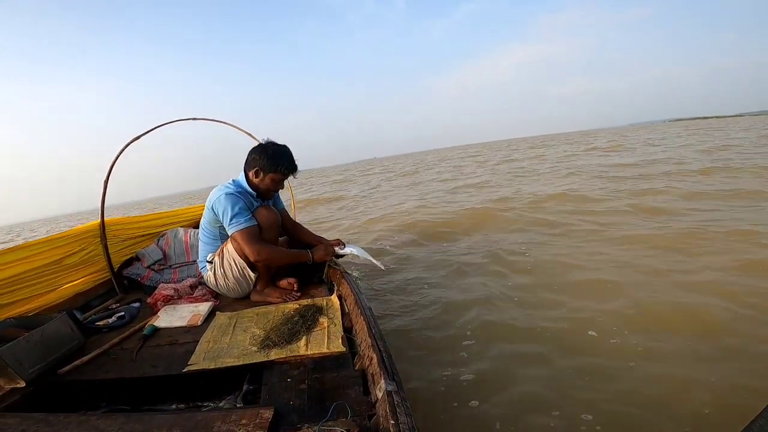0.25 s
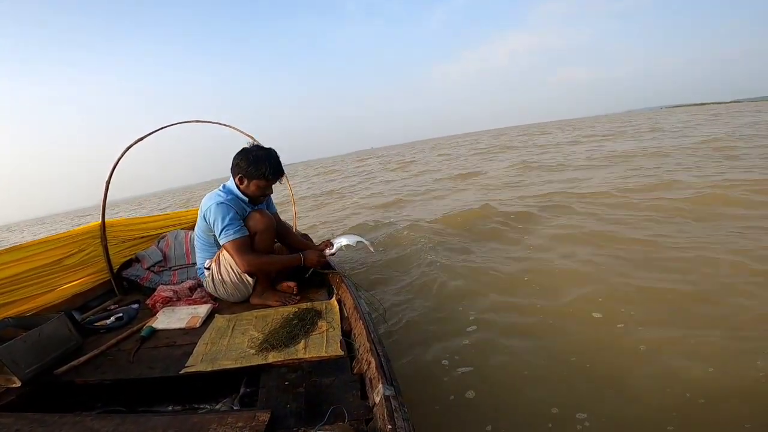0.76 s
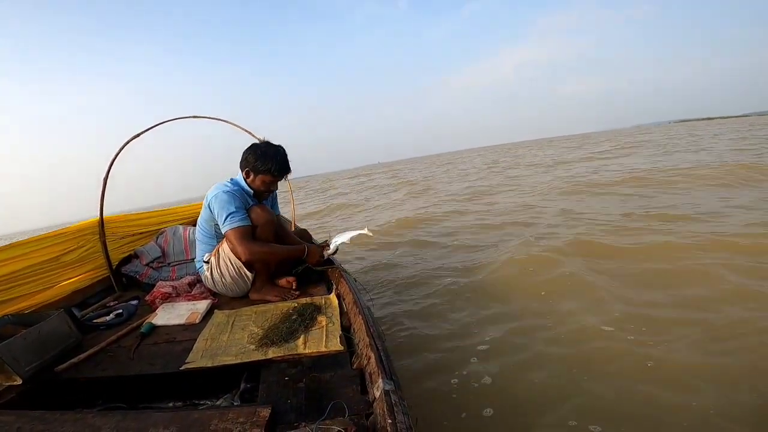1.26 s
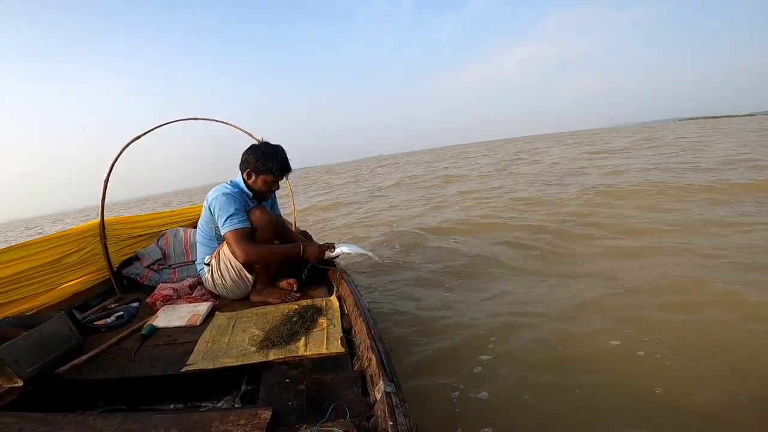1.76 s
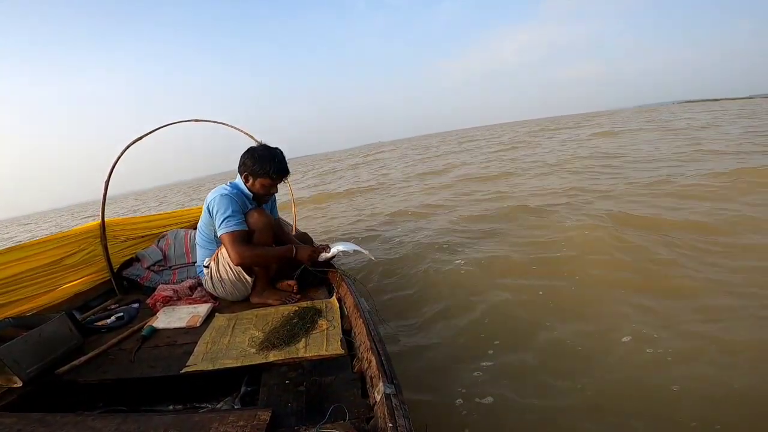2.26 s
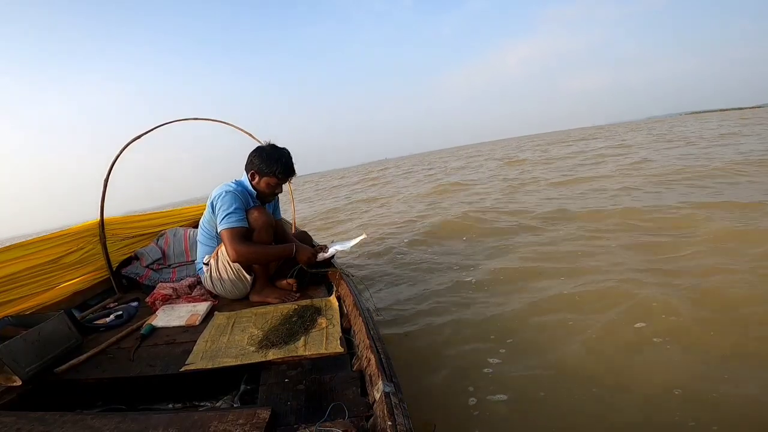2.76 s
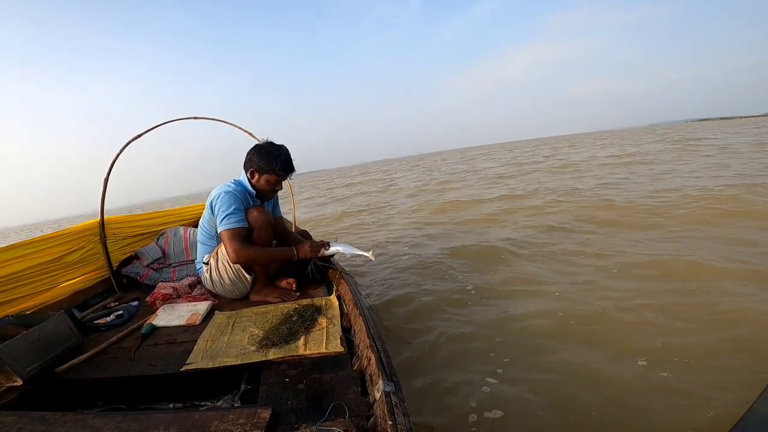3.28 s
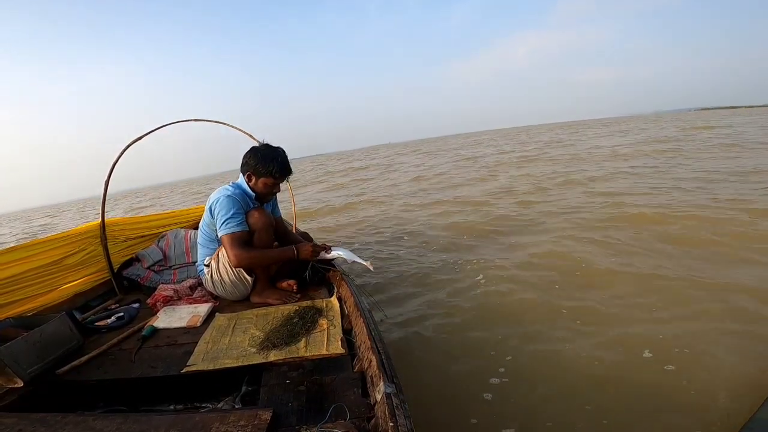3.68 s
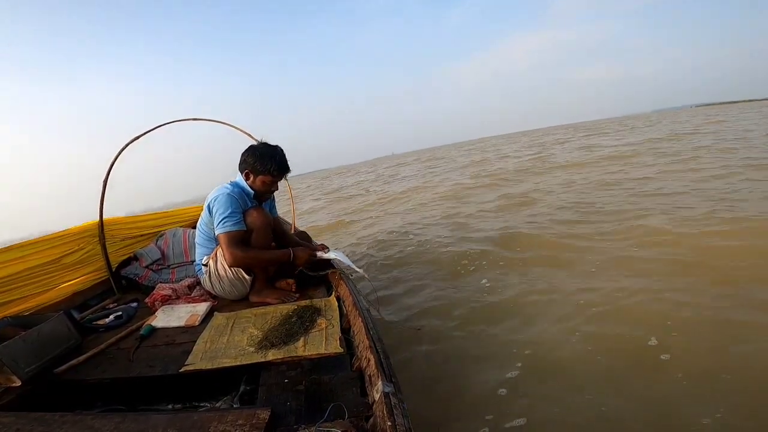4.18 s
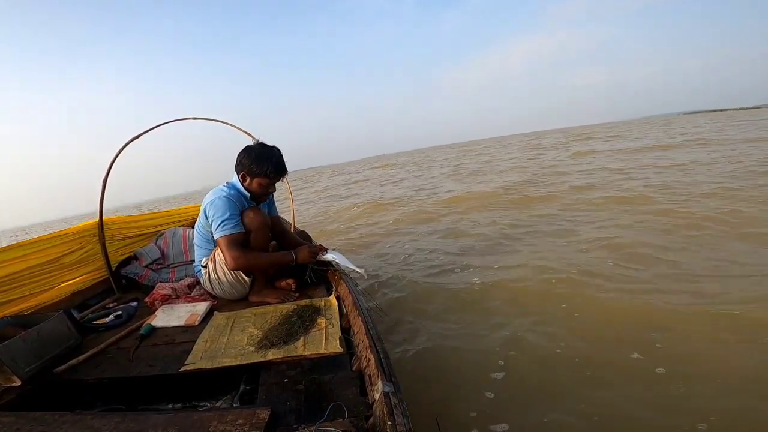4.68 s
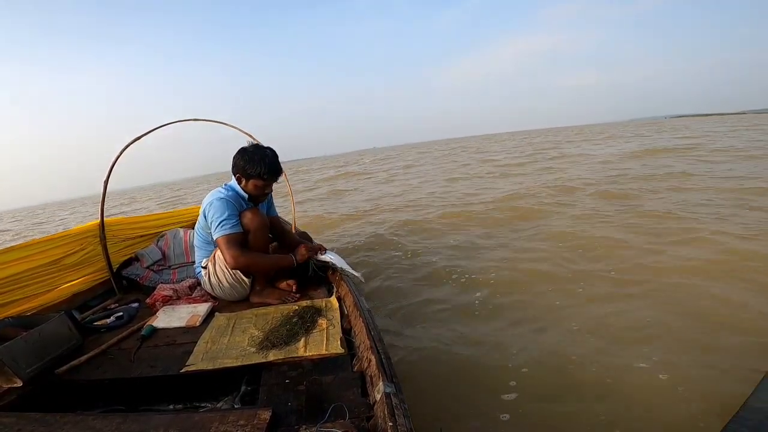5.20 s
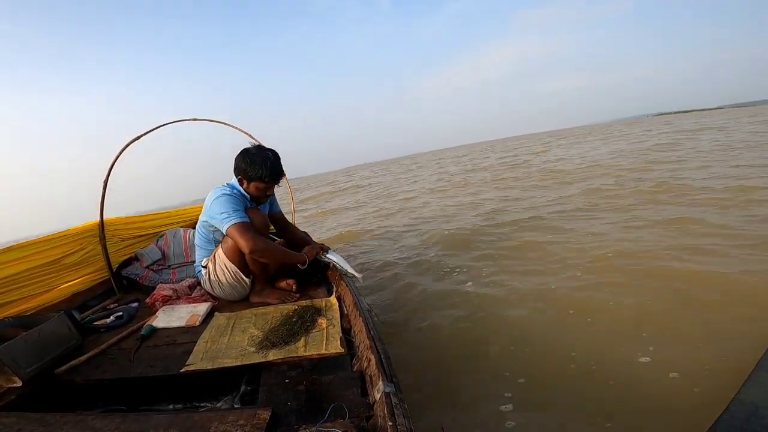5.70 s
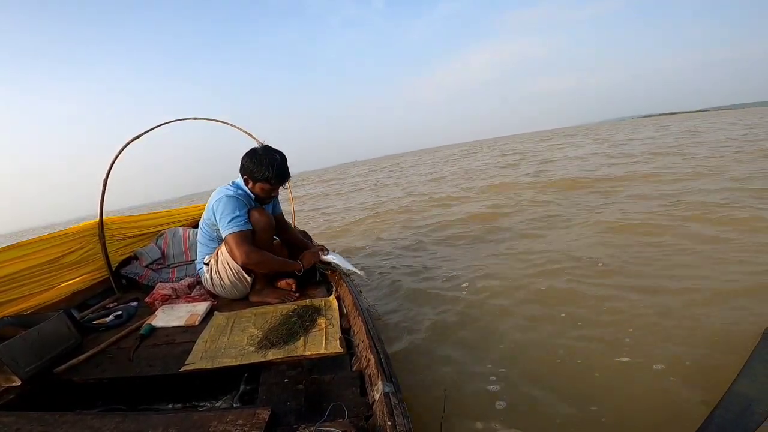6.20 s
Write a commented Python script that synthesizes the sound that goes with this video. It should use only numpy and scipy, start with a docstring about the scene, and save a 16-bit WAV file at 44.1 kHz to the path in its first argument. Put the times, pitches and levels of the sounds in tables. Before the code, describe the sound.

River chop laps against a small wooden boat with hollow slaps, low thumps, bubbly plops and drips, over light uneven wind rumble.

```python
"""You hear river chop lapping against a small wooden boat: slaps, low thumps, fizz, plops and drips.
Each slap is shaped noise plus many short rings; each thump or plop is a sine whose pitch slides as it fades.
The wash is coloured noise and swarms of tiny rings that follow the swells along the side.
Behind it, steady noise makes the far ripples and uneven low noise makes light wind on the microphone."""
import sys
import numpy as np
from scipy import signal
from scipy.fft import rfft, irfft, next_fast_len
from scipy.io import wavfile
from scipy.ndimage import uniform_filter1d, map_coordinates

SR = 44100
rng = np.random.default_rng(int(sys.argv[2]) if len(sys.argv) > 2 else 0)


def unload_audio(sound):
    """Save the sound as a 16-bit wav file, at the path given as the first command line argument."""
    columns = np.transpose(np.atleast_2d(sound))
    # keep every value between -1 and 1, then stretch to whole-number steps
    steps = np.round(np.clip(columns, -1, 1) * 32767)
    wavfile.write(sys.argv[1], SR, steps.astype(np.int16))


N = 284445
TOP_HZ = 15700  # upper limit of the sound

# Air pockets trapped under the hull
# [t/s, peak level/dB before a trim, f/Hz at the start, time to fade 60 dB/s, level of the hull's rumble/dB]
AIR_POCKETS = [(.137, -31.5, 120, 0.072, -41.5), (.28, -57, 103, 0.13, -47.5), (.315, -42, 159, 0.3, -46.5),
               (1.812, -39, 178.8, 0.36, -49.5), (1.913, -31.5, 208, 0.079, -40),
               (1.923, -32, 140.7, 0.1, -50.5), (2.053, -42, 117.6, 0.11, -48.5),
               (2.312, -35, 86, 0.079, -46.5), (3.29, -38.5, 112.4, 0.21, -50),
               (3.526, -26, 147.8, 0.12, -47), (3.55, -33.5, 176, 0.21, -56.5),
               (4.447, -35.5, 121.5, 0.082, -51.5), (4.81, -35.5, 157, 0.21, -51),
               (5.501, -46.5, 72.6, 0.14, -50.5), (5.992, -42, 114.5, 0.095, -51.5),
               (6.082, -39.5, 94, 0.021, -47), (6.144, -42.5, 139, 0.1, -63)]
# Single bubbles pinching off [t/s, peak level/dB before a trim, f/Hz at the start, time to fade 60 dB/s]
SINGLE_BUBBLES = [(.033, -44, 1720, 0.012), (0.035, -48.5, 1200, 0.029), (0.063, -52, 1285, 0.064),
                  (.093, -52.5, 1120, 0.14), (0.152, -41, 2050, 0.0098), (.171, -51.5, 574, 0.043),
                  (0.216, -54.5, 1300, .037), (.226, -41.5, 810, 0.047), (.405, -55, 1760, 0.08),
                  (.571, -43.5, 3060, 0.0087), (0.655, -50, 3030, 0.0089), (.658, -51.5, 810, 0.034),
                  (.716, -51.5, 1830, 0.01), (0.948, -51.5, 1745, 0.063), (1.026, -56.5, 2580, 0.046),
                  (1.085, -51.5, 2650, 0.0057), (1.13, -52, 2760, 0.017), (1.185, -57.5, 2780, 0.012),
                  (1.289, -52.5, 2750, 0.012), (1.341, -54, 1230, 0.012), (2.17, -53, 640, .08),
                  (2.387, -57, 2530, 0.021), (3.443, -41, 894, 0.032), (3.445, -42.5, 1500, 0.033),
                  (3.498, -50, 690, 0.019), (3.65, -50.5, 1010, 0.028), (3.726, -51.5, 1220, 0.033),
                  (3.991, -52.5, 3410, 0.024), (4.149, -45.5, 2100, 0.035), (4.653, -51.5, 1264, 0.038),
                  (4.772, -52.5, 1270, .023), (5.258, -41.5, 920, 0.052), (5.432, -54, 2170, 0.12),
                  (5.448, -28.5, 2650, 0.0074), (5.448, -35, 3560, 0.013), (5.451, -30, 1860, 0.012),
                  (5.506, -48, 3000, .025), (5.509, -52, 3260, .017), (5.5146, -30.5, 1855, 0.013),
                  (5.519, -46, 1335, .05), (5.719, -44.5, 2400, 0.013), (6.304, -50.5, 1310, 0.011)]
# Colour of low rumble, for wind and hull [f/Hz, relative level/dB]
LOW_RUMBLE = [(10, -8.5), (30, 3.5), (60, -1), (110, -7.5), (170, -12.5), (260, -22.5), (450, -37.5),
              (900, -62), (3000, -102)]


def amp(db):
    """Turn decibels into gain."""
    return 10 ** (np.asarray(db) / 20)


def unit(x):
    """Scale to rms 1, so that a gain then sets the level."""
    return x / np.sqrt(np.mean(x ** 2) + 1e-20)


def curves(rows):
    """Draw straight lines between the rows: one value per sample for each column after the time."""
    s, *columns = np.transpose(rows)
    t = np.arange(N) / SR
    return [np.interp(t, s, column) for column in columns]


def wobble(rate):
    """A smooth random curve through rate random points a second."""
    points = rng.standard_normal(int(N * rate / SR) + 4)
    return map_coordinates(points, [np.arange(N) * rate / SR])


def filtered(x, response):
    """Multiply the spectrum of x by a response that depends on frequency."""
    m = next_fast_len(len(x) + 8192)  # spare room for the filter's tail
    hz = np.fft.rfftfreq(m, 1 / SR)
    return irfft(rfft(x, m) * response(hz), m)[:len(x)]


def spectrum_gain(points, hz):
    """Read a gain from (f/Hz, level/dB) points joined on a log frequency axis."""
    f, db = np.transpose(points)
    return amp(np.interp(np.log(hz + 1), np.log(f), db))


def coloured(x, points):
    """Give x the colour of (f/Hz, level/dB) points, at rms 1."""
    return unit(filtered(x, lambda hz: spectrum_gain(points, hz)))


def resonance(f, hz, q):
    """Response of one resonance, strongest at hz; a higher q makes it narrower."""
    return 1j * f * hz / q / (hz * hz - f * f + 1j * f * hz / q)


def even(x, seconds):
    """Hold the short-term rms of x near 1, leaving its fine grain."""
    size = int(seconds * SR)
    power = uniform_filter1d(uniform_filter1d(unit(x) ** 2, size), size)
    return unit(x / np.sqrt(np.abs(power) + 0.015))


def add(track, s, sound):
    """Mix a sound into the track at time s."""
    start = int(np.clip(round(s * SR), 0, N - 1))
    track[start:start + len(sound)] += sound[:N - start]


def ring(hz, t60, glide, attack_cycles):
    """One air cavity rings with peak envelope 1 while its pitch slides by glide octaves over t60."""
    t = np.arange(int(t60 * SR) + 2) / SR
    pitch = hz * 2 ** (glide * t / t60)
    shape = amp(-60 * t / t60) * (1 - np.exp(-(t * hz / attack_cycles) ** 2))
    return shape / shape.max() * np.sin(2 * np.pi * np.cumsum(pitch) / SR)


def bubbles(count, hz, spread, cycles, size_db):
    """An even swarm of tiny ringing bubbles at rms 1; higher-pitched ones die sooner."""
    chance = rng.random((count, 5))
    t = np.arange(min(SR // 25, 3000000 // count)) / SR
    octaves = spread * (chance[:, :1] + chance[:, 1:2] - 1)
    pitch = np.minimum(hz * 2 ** octaves, TOP_HZ)
    age = t * pitch / cycles
    size = amp(-size_db * np.log(1 - .96 * chance[:, 2:3]))  # a few are much louder
    slide = 1 + 0.43 * (chance[:, 4:] - .4) * np.minimum(age, 1)  # most rise as they near the surface
    tone = np.sin(2 * np.pi * pitch * t * slide)
    rings = size * tone * amp(-60 * age) * (1 - np.exp(-t * pitch))
    where = (chance[:, 3:4] * N).astype(int) + np.arange(len(t))
    return unit(np.bincount(where.ravel(), rings.ravel(), N)[:N])


def river():
    """Far ripples on the open river blend into a steady, quiet noise."""
    # Colour of the far ripples [f/Hz, relative level/dB]
    ripple_colour = [(100, 17.5), (600, -25.5), (1200, 0), (2500, -22), (5000, -15.5), (9000, -22),
                     (12000, -28), (16000, -19.5)]
    return amp(-77.5) * coloured(rng.standard_normal(N), ripple_colour)


def wind():
    """Lumpy low turbulence at the microphone: rumble whose level drifts and gusts."""
    # Strength of the wind [t/s, level/dB before the lift below]
    wind_curve = [(0, -45.5), (.08, -49), (.5, -55), (.77, -59), (1.02, -59.5), (1.12, -54), (1.62, -53),
                  (1.76, -57.5), (2.42, -53), (2.56, -64), (2.7, -51.5), (2.9, -53), (3.05, -60),
                  (3.7, -52.5), (4.6, -59), (5, -51), (5.8, -56.5), (6.3, -49.5)]
    lift_db, gust_db = 1, 3.5
    level_db, = curves(wind_curve)
    rumble = even(coloured(rng.standard_normal(N), LOW_RUMBLE), seconds=0.045)
    gusty = unit(rumble * amp(gust_db * wobble(24)))
    return amp(level_db + lift_db) * gusty


def surge_levels():
    """Churn and spray in dB: every swell builds to its crest and drains away, over calm water."""
    # Swells running along the side; the wash, bubbles and droplets shift these levels
    # [t/s of the crest, churn level/dB, spray level/dB, build time/s, time to fade 60 dB/s]
    swells = [(.05, -65.5, -74.5, 0.11, 0.7), (.3, -58.5, -80, 0.026, 0.27), (.47, -67, -76, 0.046, 1.18),
              (.64, -66.5, -77, 0.012, 0.27), (.76, -81.5, -100, 0.035, 1.5),
              (.88, -74.5, -96.5, 0.022, 1.7), (1.02, -79.5, -87, .04, 0.36),
              (1.351, -80.5, -94, 0.097, 1.5), (1.87, -74.5, -87, 0.085, 0.82),
              (2.181, -77, -78, 0.022, 0.33), (2.49, -78, -89, 0.052, 2.2), (3.101, -77, -107.5, 0.29, 4.8),
              (3.54, -66, -86.5, 0.027, 1.97), (3.9, -71, -86.5, .14, 1.9), (4.19, -73, -77.5, 0.13, .65),
              (4.5, -83, -90, 0.14, 1.2), (4.792, -66.5, -81, 0.044, 0.42), (5.03, -72, -80.5, 0.11, 1.5),
              (5.199, -67.5, -82.5, 0.075, 2), (5.47, -80.5, -74.5, 0.042, 0.854),
              (5.721, -80, -84, 0.16, 0.77), (6.16, -75.5, -90.5, 0.11, 2.1)]
    calm_churn_db, calm_spray_db = -91, -104  # the water between swells
    t = np.arange(N) / SR
    churn, spray = amp(calm_churn_db) ** 2, amp(calm_spray_db) ** 2
    for s, churn_db, spray_db, build, t60 in swells:
        building = np.exp(-((t - s) / build) ** 2)
        draining = amp(-60 * np.abs(t - s) / t60)
        shape = np.where(t < s, building, draining)
        churn = churn + (amp(churn_db) * shape) ** 2
        spray = spray + (amp(spray_db) * shape) ** 2
    return 10 * np.log10(churn), 10 * np.log10(spray)


def wash():
    """Water churns along the planks and its spray fizzes; the harder it runs, the more bubbles sound."""
    # Colour of the spray [f/Hz, relative level/dB]
    spray_colour = [(900, -27.5), (2000, -3), (3400, -1.5), (4200, -4.5), (5200, -9.5), (7000, -16.5),
                    (9500, -17.5), (12000, -28), (15500, -24)]
    # Colour of the churning water [f/Hz, relative level/dB]
    churn_colour = [(120, -6), (300, 4.5), (450, 3.5), (650, -3), (1200, 1), (2000, -5), (3100, -10.5),
                    (4500, -30.5), (7000, -44)]
    churn_db, spray_db = surge_levels()
    vigour = np.clip((churn_db + 92.5) / 18, .25, 1)  # share of bubble sound

    gurgle = even(bubbles(count=2300, hz=1497, spread=1.35, cycles=56, size_db=12.0), seconds=0.078)
    churn = 0.74 * coloured(rng.standard_normal(N), churn_colour) + 0.55 * vigour * gurgle

    crackle = bubbles(count=3800, hz=6434, spread=1.5, cycles=48, size_db=5)
    crackle = even(coloured(crackle, spray_colour), seconds=0.32)
    mist = rng.standard_normal(N) * amp(5.8 * wobble(350))  # films of foam tear in tiny flurries
    spray = 0.95 * coloured(mist, spray_colour) + 0.67 * vigour * crackle

    churn_gain = amp(churn_db + 0.08 + 3.5 * wobble(40))
    spray_gain = amp(spray_db + 2.5 + 3.5 * wobble(32))
    return churn_gain * churn + spray_gain * spray


def trickle(count):
    """Stray small bubbles pop up all along the side, louder where the water churns."""
    lift_db, follow, scatter_db = 3, 1.14, 2  # follow: dB per dB of churn
    middle_hz, octaves, cycles = 1542, 2.1, 42  # octaves: whole pitch range; cycles: time to fade 60 dB
    out, churn_db = np.zeros(N), surge_levels()[0]
    mean_db = churn_db.mean()
    for k, (at, size, loud, slide) in enumerate(rng.random((count, 4))):
        s = (k + at) / count * (N - 1) / SR  # one in each equal slice of time
        hz = middle_hz * 2 ** (octaves * (size - .5))
        db = mean_db + follow * (churn_db[int(s * SR)] - mean_db)
        db += lift_db + scatter_db * (2 * loud - 1)
        add(out, s, amp(db) * ring(hz, cycles / hz, glide=slide - .5, attack_cycles=1.9))
    return out


def droplets(count):
    """Fine drops of spray fall back as sharp little ticks, each with its own pitch."""
    lift_db, scatter_db = 4, 4.5
    middle_hz, octaves, cycles = 6410, 1.8, 38  # octaves: whole pitch range; cycles: time to fade 60 dB
    out, spray_db = np.zeros(N), surge_levels()[1]
    for k, (at, size, loud) in enumerate(rng.random((count, 3))):
        s = (k + at) / count * (N - 1) / SR  # one in each equal slice of time
        hz = min(middle_hz * 2 ** (octaves * (size - .5)), TOP_HZ)
        db = spray_db[int(s * SR)] + lift_db - scatter_db * np.log(1 - .95 * loud)
        add(out, s, amp(db) * ring(hz, cycles / hz, glide=0.092, attack_cycles=0.93))
    return out


def splats():
    """Each small splash and each bubble gives a soft tick of water on water among fine droplet noise."""
    # Small bursting crests and splashes, some together with a bubble [t/s, peak level/dB, centre f/Hz]
    small_splashes = [(.075, -54, 3400), (.131, -52, 3230), (.451, -57, 2520), (.512, -56, 4000),
                      (.622, -55.5, 1780), (.762, -62, 3500), (1.027, -60.5, 6350), (1.084, -64, 4240),
                      (1.341, -65, 4000), (1.16, -62.5, 10000), (2.1696, -45.5, 1330), (2.174, -49, 2980),
                      (2.196, -59, 6960), (2.388, -61, 5280), (3.145, -62.5, 5200), (4.045, -55, 2770),
                      (4.184, -55, 3300), (4.194, -52, 3000), (4.223, -63.5, 7800), (4.358, -66, 5300),
                      (4.726, -60, 5500), (5.183, -52.5, 3060), (5.491, -53, 3900), (5.611, -57, 3940),
                      (5.661, -62, 6930)]
    tick_db, tick_ratio = -12.5, 1.04  # a bubble's tick: level against its table row, pitch against its ring
    out, t = np.zeros(N), np.arange(SR // 16) / SR
    lead = SR // 200  # samples of noise ahead of the contact
    contact = t - t[lead]
    pinches = [(s, db + tick_db, hz * tick_ratio) for s, db, hz, t60 in SINGLE_BUBBLES]
    for s, db, hz in list(small_splashes) + pinches:
        fade = amp(-60 * np.maximum(contact / 0.082, -contact / 0.043))
        burst = 0.05 * rng.standard_normal(len(t)) * fade
        burst[lead] += 1  # the contact itself
        tick = filtered(burst, lambda f: resonance(f, hz, q=1.54) ** 2 + 0.012 * resonance(f, hz, q=1.0))
        add(out, s - t[lead], amp(db) * tick / np.abs(tick).max())
    return out


def plops():
    """Single bubbles pinch off close to the side; large ones slide up in pitch, small ones down."""
    level_hz, glide_slope = 1070, .5  # pitch that stays level; octaves of slide per octave away from it
    out = np.zeros(N)
    for s, db, hz, t60 in SINGLE_BUBBLES:
        glide = glide_slope * np.log2(level_hz / hz)
        add(out, s, amp(db - 5.5) * ring(hz, t60, glide, attack_cycles=1.2))
    return out


def hull_echo(x):
    """The planks and the water surface scatter a very short answer."""
    t = np.arange(SR // 8) / SR
    tail = rng.standard_normal(len(t)) * amp(-60 * t / 0.042) * (1 - np.exp(-t / 0.0017))
    return signal.fftconvolve(x, tail / np.linalg.norm(tail))[:N]


def bounce(x, delay, share):
    """One reflection off the side of the boat gives the water a hollow colour."""
    def response(f):
        late = np.exp(-2j * np.pi * f * delay)
        return 1 + share * late / (1 + (f / 4500) ** 2)  # the reflection is duller
    return filtered(x, response)


def heave():
    """Each air pocket shoves the hull, which rumbles for a moment."""
    half_length_s, lag_s = 0.031, 0.013  # lag: from the pocket's start to the middle of the rumble
    hull_hz = 72.6  # centre of the hull's resonance
    t = np.arange(N) / SR
    push = sum(amp(heave_db) * np.exp(-((t - s - lag_s) / half_length_s) ** 2)
               for s, *_, heave_db in AIR_POCKETS)
    rumble = coloured(rng.standard_normal(N), LOW_RUMBLE)
    hull = filtered(rumble, lambda f: resonance(f, hull_hz, q=.75))
    return push * even(hull, seconds=0.049)


def thumps():
    """Large air pockets boom briefly against the hull, rising as they are squeezed."""
    out = np.zeros(N)
    for s, db, hz, t60, _ in AIR_POCKETS:
        add(out, s, amp(db - 4.0) * ring(hz, t60, glide=0.34, attack_cycles=0.51))
    return out


def planks(x):
    """The hull rings briefly at its own low modes."""
    # Ringing modes of the hull [f/Hz, quality (higher rings longer), relative level/dB]
    hull_modes = [(182.6, 7.4, 9), (299, 2.3, -4), (414, 43, -14.5)]
    return filtered(x, lambda f: sum(amp(db) * resonance(f, hz, q) for hz, q, db in hull_modes))


def rush(hz, rise, t60):
    """Small impacts and gulping air cavities around one pitch, swelling and dying away."""
    t = np.arange(SR // 2) / SR
    impacts = rng.standard_normal(len(t)) * amp(4.86 * rng.standard_normal(len(t)))
    patter = filtered(impacts, lambda f: resonance(f, hz, q=1.49) ** 2 + 0.032 * resonance(f, hz, q=0.83))
    cavities = np.zeros(N)
    for at, size in rng.random((int(hz / 8), 2)):
        pitch = hz * 2 ** (1.54 * (size - .5))
        gulp = ring(pitch, t60=18 / hz, glide=0.31, attack_cycles=0.84)
        add(cavities, at * t[-1] - .01, gulp)
    body = even(unit(patter) + 0.73 * unit(cavities[:len(t)]), seconds=0.024)
    return body * np.minimum(t / rise, 1) * amp(-60 * np.maximum(t - rise, 0) / t60)


def slaps():
    """The crest smacks the planks, then the wave's body lands; the gap that it closes sets its colour."""
    # Waves meeting the planks, both levels before the trim below
    # [t/s of the body, body level/dB, centre f/Hz, rise time/s, time to fade 60 dB/s, smack level/dB]
    plank_hits = [(.3, -48, 252, 0.0081, 0.21, -61), (.858, -55, 433, 0.0029, 0.27, -64),
                  (1.807, -44.5, 320, 0.0084, 0.26, -64), (1.904, -46.5, 216, 0.032, .12, -71),
                  (2.231, -60.5, 712, 0.0061, 0.18, -75), (2.319, -54.5, 725, 0.024, 0.2, -90),
                  (2.326, -62, 257, 0.017, 0.65, -86), (3.447, -51, 232.5, .003, 0.44, -53.5),
                  (3.494, -54, 496, 0.0099, 0.54, -64), (3.525, -59.5, 263, .004, 1, -55),
                  (3.874, -47.5, 420, 0.0066, 0.3, -77), (4.02, -57, 318, 0.028, .48, -83),
                  (4.22, -63, 960, 0.0072, 0.46, -73), (4.514, -62.5, 350, 0.0052, 0.33, -79),
                  (4.8, -47, 306, 0.015, 0.34, -72.5), (4.942, -62, 412, .0067, 0.37, -68),
                  (5.035, -58.5, 859, 0.0096, 0.06, -87), (5.181, -52, 552, .0027, 0.28, -60),
                  (5.441, -53, 2400, 0.0047, .1, -63), (5.501, -54, 2170, 0.01, 0.043, -76),
                  (6.131, -61, 388, 0.034, 0.12, -84), (6.203, -62.5, 670, 0.0047, .26, -85)]
    smack_lead_s = 0.0079  # the smack starts this long plus one rise time ahead of the body
    out = np.zeros(N)
    for s, db, hz, rise, t60, smack_db in plank_hits:
        smack = rush(hz=1482, rise=0.009, t60=0.12)
        add(out, s - rise - smack_lead_s, amp(smack_db) * smack)
        add(out, s, amp(db) * rush(hz, rise, t60))
    return amp(-4) * out


def scene():
    """Near water, the open river behind it, and wind."""
    near = plops() + splats() + trickle(count=290) + droplets(count=190)
    waves = slaps()
    water = near + amp(-9.5) * hull_echo(near)
    water = water + waves + amp(1.5) * planks(waves) + wash()
    boat_side = bounce(water, delay=.00235, share=0.028)  # delay in seconds
    return (boat_side + thumps() + heave() + river() + wind())[None]


def record(dry):
    """The microphone dulls the high treble and keeps nothing above its band limit."""
    # Tone of the microphone [f/Hz, level/dB]
    microphone_tone = [(5000, 1.5), (7000, 2.5), (9800, 1.5), (11500, -0.5), (15500, -4.5)]
    return filtered(dry[0], lambda hz: spectrum_gain(microphone_tone, hz) * (hz < TOP_HZ))[None]


dry = scene()
out = record(dry)
unload_audio(out)
```